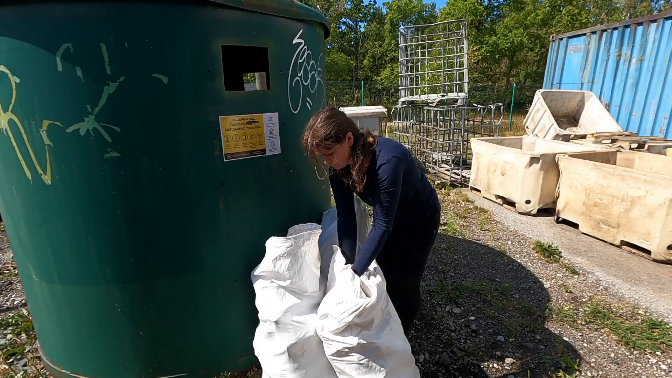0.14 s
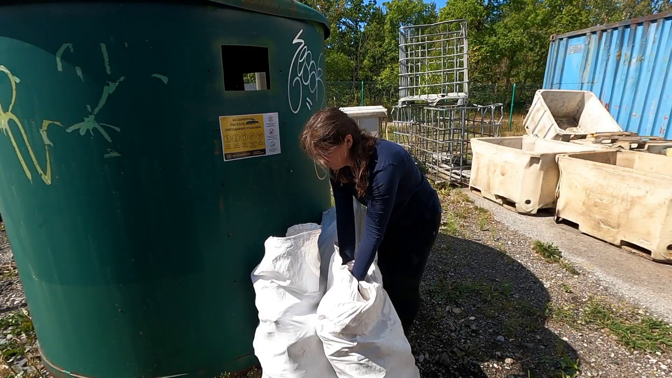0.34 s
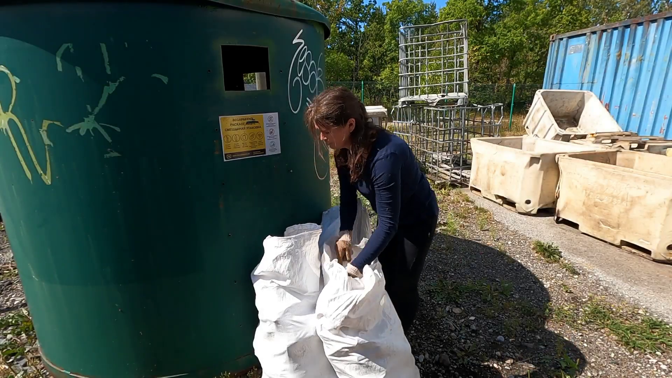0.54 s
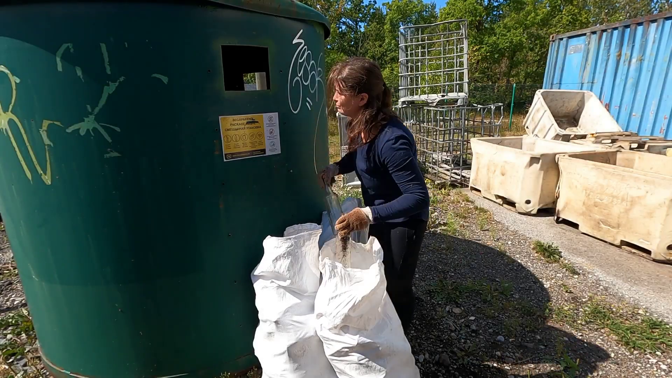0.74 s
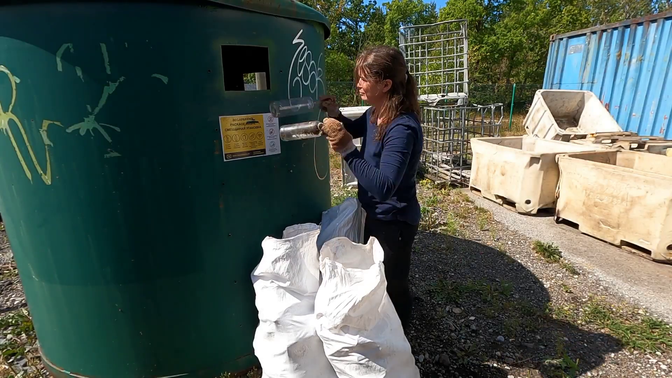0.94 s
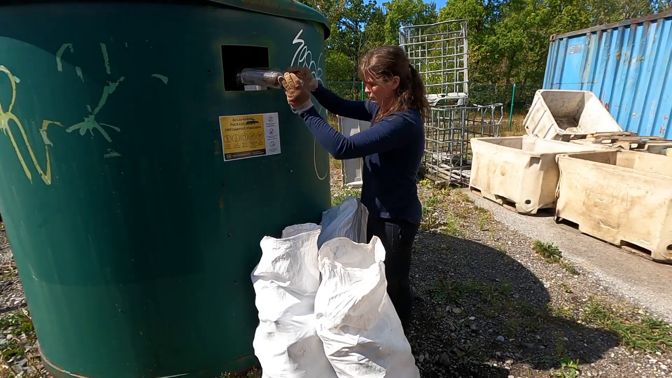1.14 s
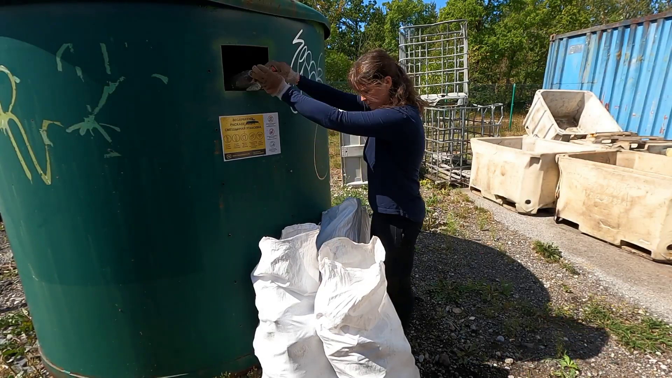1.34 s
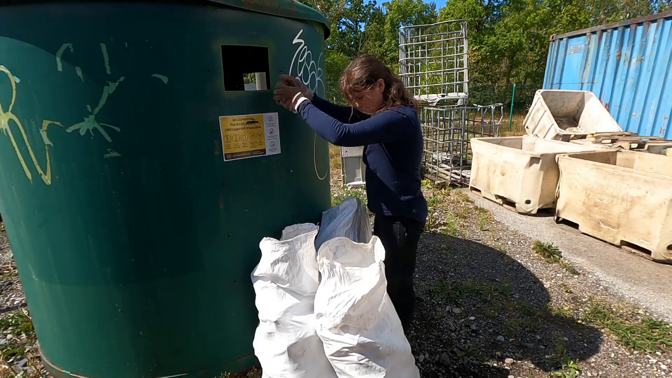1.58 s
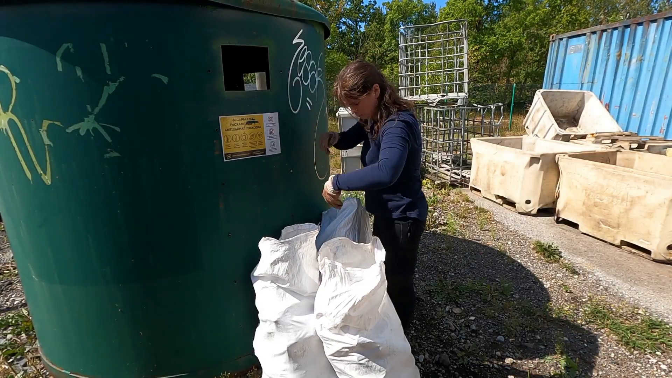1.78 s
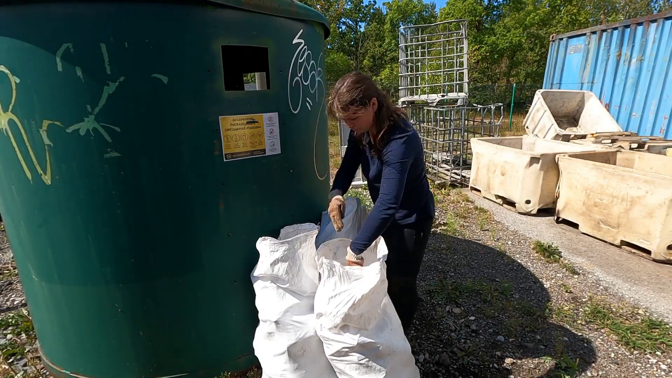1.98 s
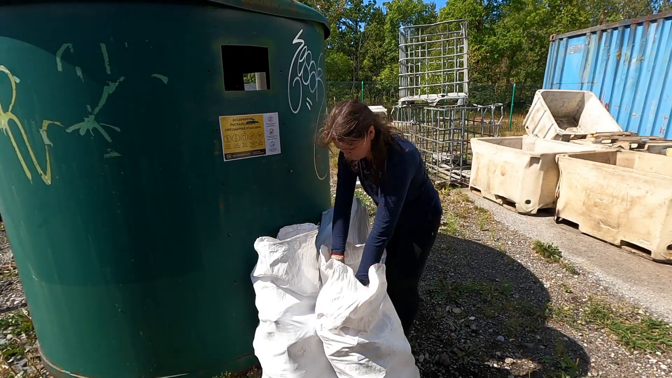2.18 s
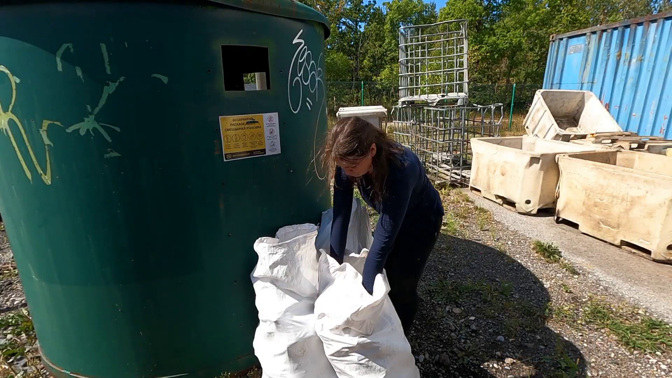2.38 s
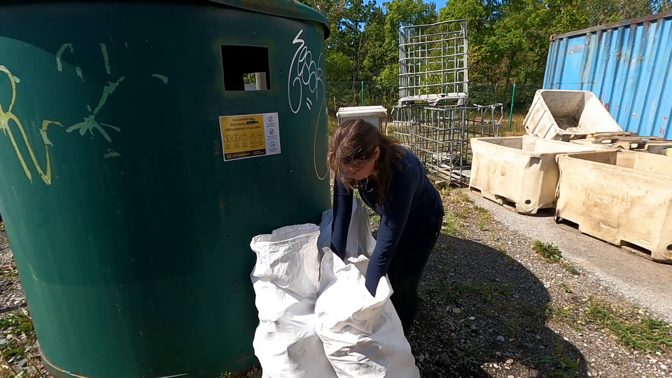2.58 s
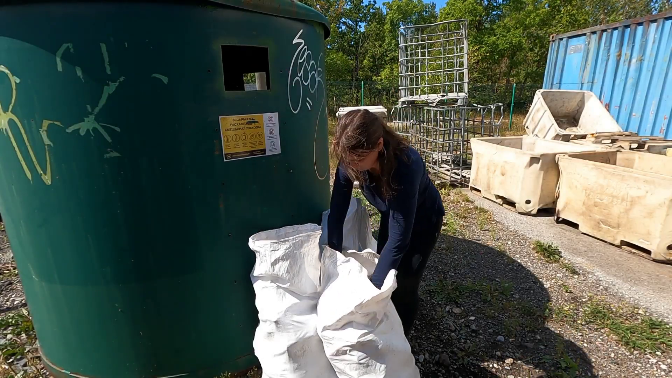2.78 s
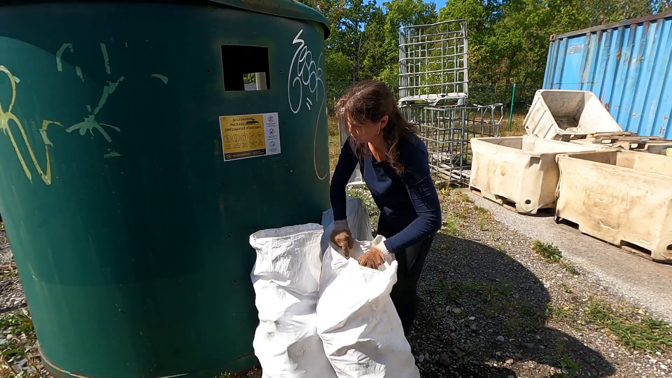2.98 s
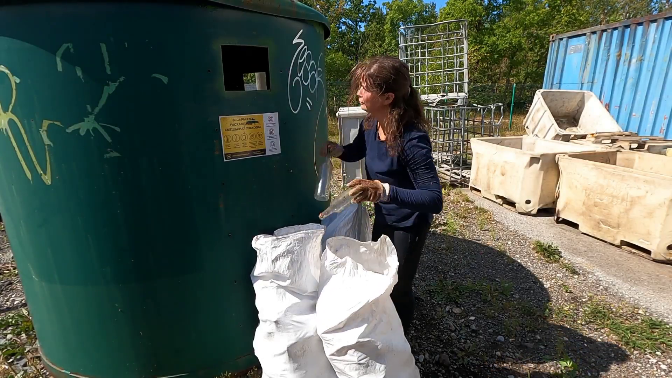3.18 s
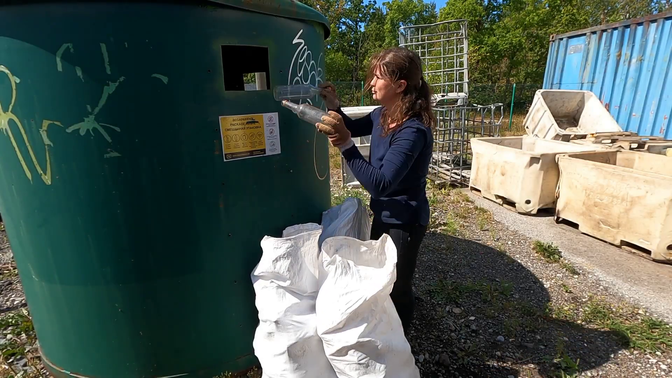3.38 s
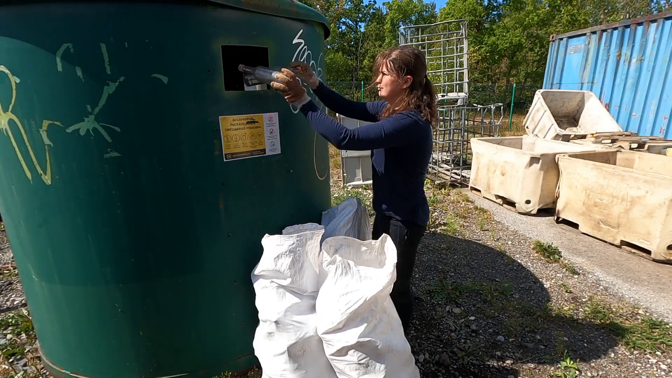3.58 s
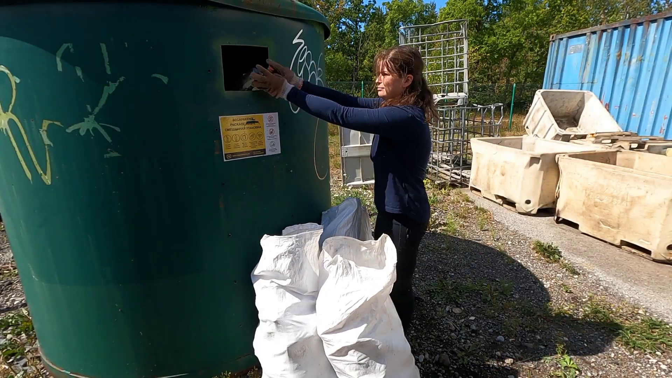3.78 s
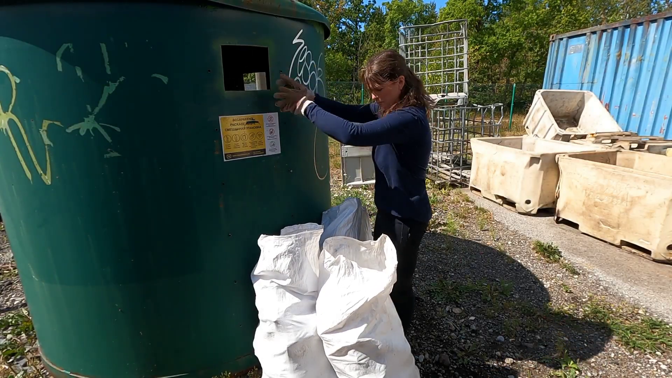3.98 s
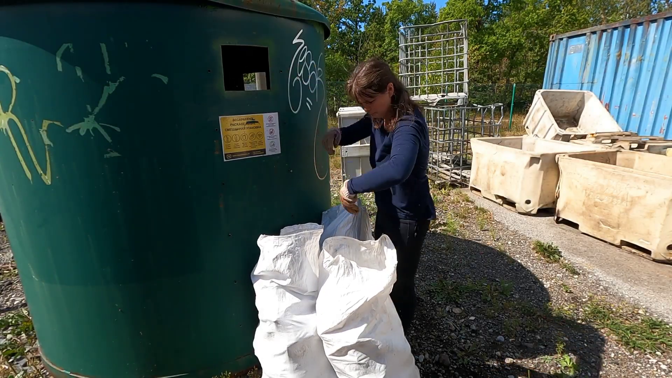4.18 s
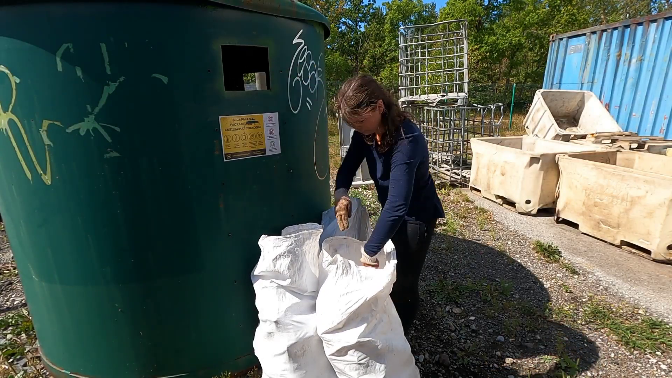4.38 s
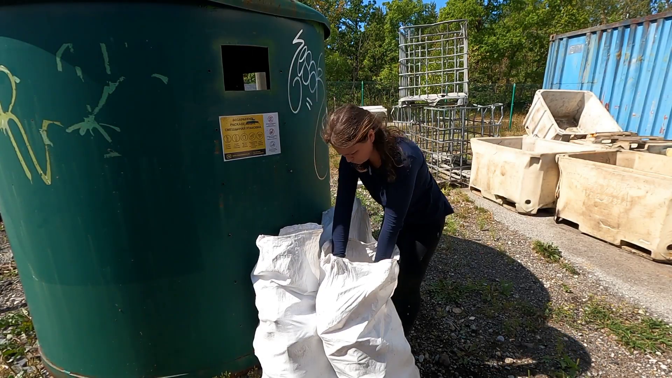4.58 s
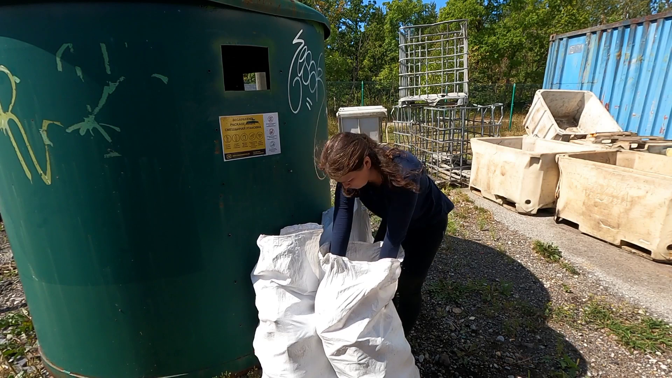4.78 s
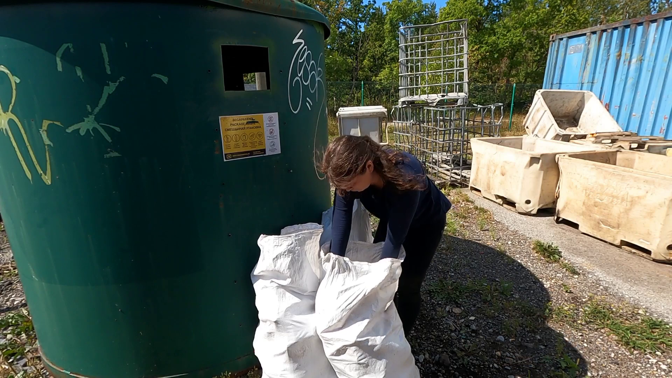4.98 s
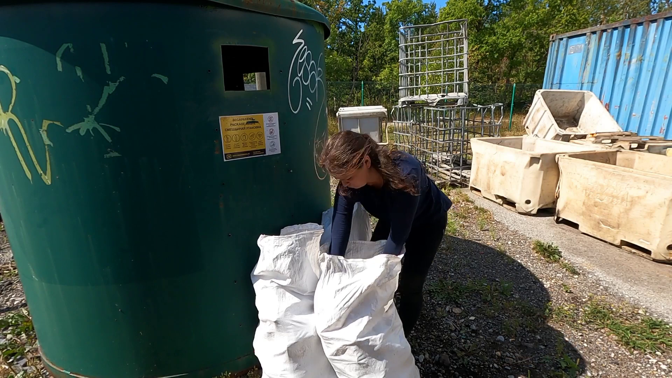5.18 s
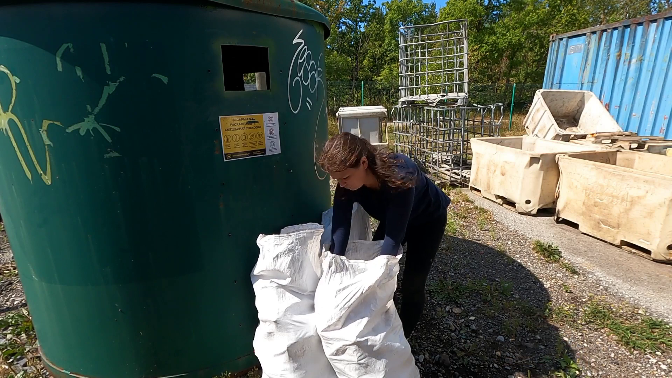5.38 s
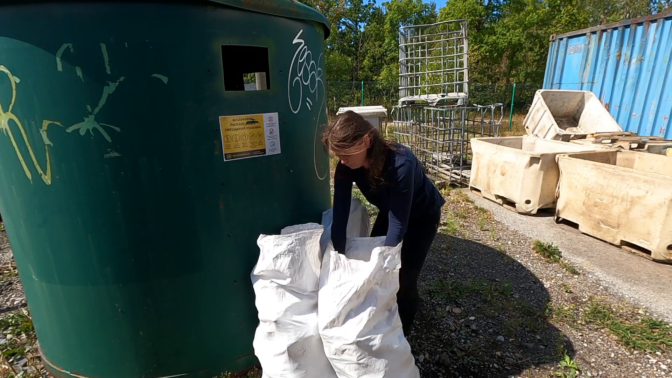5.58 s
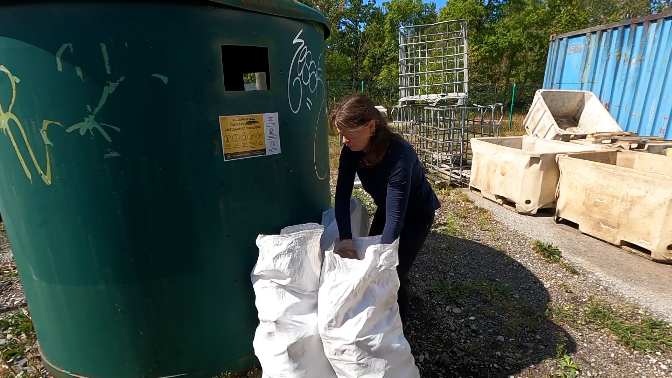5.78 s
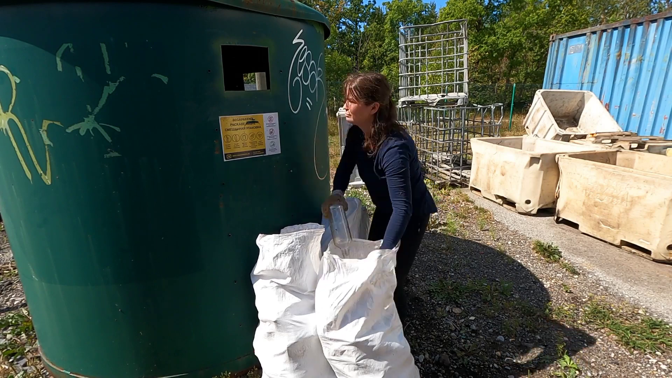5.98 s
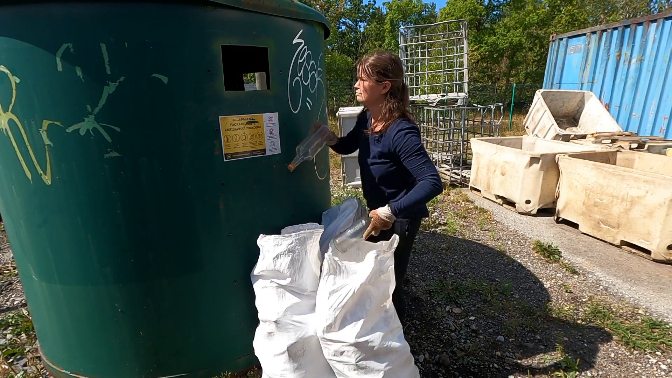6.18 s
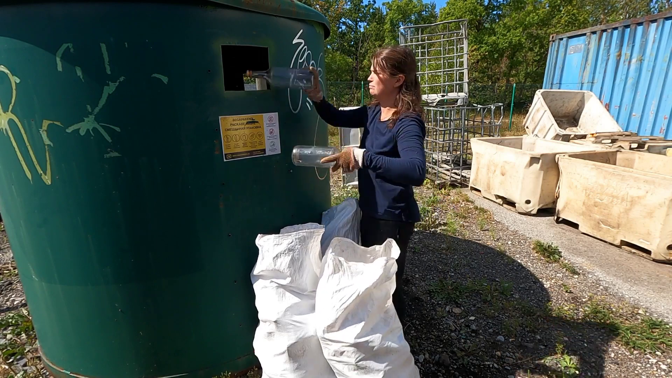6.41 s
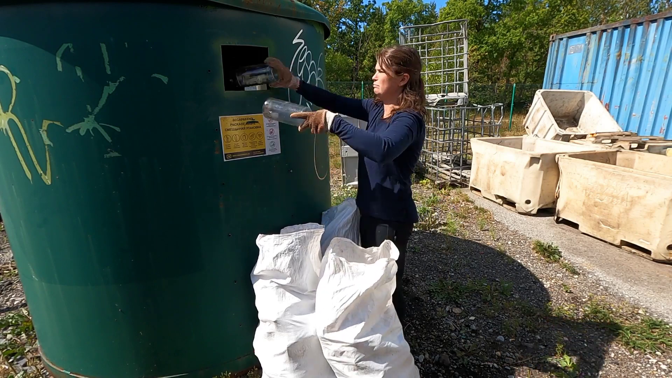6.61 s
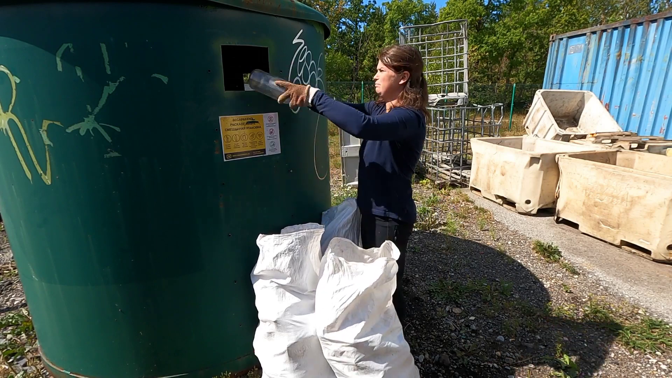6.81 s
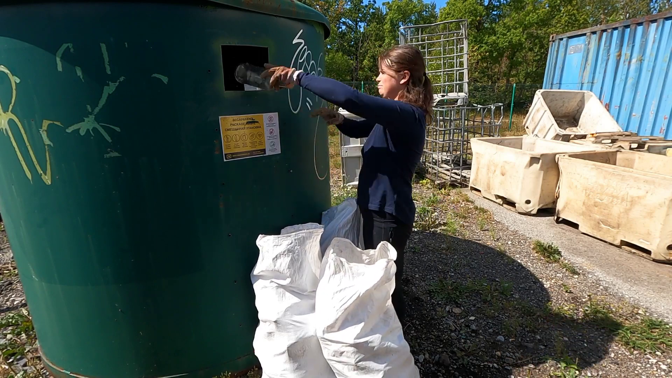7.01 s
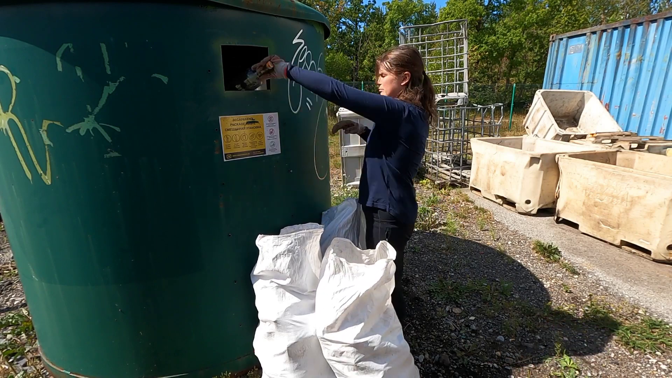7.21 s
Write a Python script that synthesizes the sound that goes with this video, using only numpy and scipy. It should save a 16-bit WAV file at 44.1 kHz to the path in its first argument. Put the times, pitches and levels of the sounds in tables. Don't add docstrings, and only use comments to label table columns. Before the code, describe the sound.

Close outdoor stereo sound of glass going into a large hollow plastic container. Bottles clink dully while a stiff sack rustles, then knock on the rim with a boom and crash onto broken glass, with shards tinkling after. More rummaging and clear bottle knocks follow, then a second sharper smash, more rummaging, and a last crash at the end. Light wind buffets the microphone over a quiet yard.

```python
import sys
import numpy as np
from scipy import signal
from scipy.fft import rfft, irfft
from scipy.io import wavfile
from scipy.ndimage import uniform_filter1d

SR = 44100
rng = np.random.default_rng(int(sys.argv[2]) if len(sys.argv) > 2 else 0)


def undo_db(level):
    steps = np.asarray(level, float) / 20
    return 10 ** steps


def unload_audio(sound):
    columns = np.transpose(np.atleast_2d(sound))
    steps = np.round(np.clip(columns, -1, 1) * 32767)
    wavfile.write(sys.argv[1], SR, steps.astype(np.int16))


N = 319725

# peak_s, level_db, build_s (time to grow by 20 dB)
GUSTS = [(.93, -27.5, 0.1), (1.15, -25.5, 0.3), (1.37, -25, 0.23), (1.84, -38, 1.4), (2.44, -30.5, 0.34),
         (3.35, -35.5, 1.1), (3.821, -50, 0.3), (4.26, -40, 0.5), (5.19, -36, .32), (6.4, -31.5, 0.02),
         (6.6, -41, 0.15), (6.78, -32.5, 0.09), (7.19, -26, 0.4)]
# pitch_hz, level_db (per Hz)
WIND_SPECTRUM = [(8.8, -22), (15, 5.5), (41, -4), (157, -16), (304, -39.5), (400, -41), (520, -53),
                 (880, -120)]
# pitch_hz, level_db (per Hz)
YARD_SPECTRUM = [(35, -25), (60, 6), (289, 6.5), (711, -16), (1390, -5), (2150, -19), (3660, -11),
                 (13500, -70)]
# time_s, level_db
STIRRING = [(0.0, -42), (0.5, -41), (0.67, -52), (1.0, -60), (1.9, -64.5), (2.03, -42), (2.82, -35.5),
            (3.17, -49.5), (3.3, -58), (4.2, -61.5), (4.38, -31.5), (5.26, -40), (5.63, -36), (5.98, -44.5),
            (6.25, -49.5), (6.77, -57.5), (7.25, -57)]
# pitch_hz, level_db (per Hz)
SACK_SPECTRUM = [(880, -1), (1500, -6), (2540, -9), (4140, -5), (6820, -10), (10600, -22.5), (11800, -23),
                 (15500, -32)]
# pitch_hz, level_db
HEAP_RINGS = [(2305, -18), (2583, 14), (3058, 10), (3250, 7), (3537, 9), (3833, -6), (4066, 10), (4847, -7),
              (5378, 4), (6070, -21), (6400, -10.5), (7610, -14)]
# pitch_hz, level_db (per Hz)
SHARD_SPECTRUM = [(1300, -4), (1900, -10.5), (2500, -7), (4000, -5), (8000, -8.5), (10500, -23),
                  (12500, -20.5), (15800, -33)]
# pitch_hz, level_db (per Hz)
WEIGHT_SPECTRUM = [(88, -10.5), (150, 0.5), (300, -5), (398, -0.5), (952, -5), (1760, -7.5), (3250, -48),
                   (5500, -120)]
# start_s, level_db, t60_s
SLIDES = [
    (1.86, -31, 2.04),
    (2.225, -31, 3),
    (2.62, -36, 1.6),
    (3.2, -50.5, 2.6),
    (4.209, -22.5, 0.23),
    (5.12, -33.5, 0.79),
    (5.97, -43.5, 1.74),
    (6.9, -38, 0.84),
    (7.134, -24.5, 0.11),
]
# start_s, peak_db, pitch_hz
KNOCKS = [(0.148, -16, 1310), (0.471, -25.5, 1160), (0.509, -19, 1530), (0.537, -17.5, 1180),
          (0.558, -19, 1020), (0.58, -26, 1160), (1.85, -10, 900), (2.817, -22, 1320), (2.861, -18, 1030),
          (2.894, -12, 1460), (3.014, -23, 1090), (3.176, -13, 1150), (4.209, -12, 1220),
          (4.706, -25.5, 1180), (5.24, -14, 1140), (5.46, -12.5, 1350), (5.515, -16.5, 1030),
          (5.779, -23.5, 1150), (5.972, -8, 1460), (6.061, -13, 1020)]
# pitch_hz, level_db (per Hz)
KNOCK_SPECTRUM = [(400, -6), (900, -0.5), (1700, -5), (3000, -7), (6000, -23)]
# start_s, peak_db, pitch_hz, overtone_hz
HELD_CLINKS = [(0.150, -20, 2380, 4150), (0.169, -18, 5160, 4150), (0.467, -26, 6450, 5260),
               (0.478, -20, 4880, 4050), (0.537, -17, 5620, 3290), (0.941, -32, 2570, 6440),
               (2.894, -21, 3520, 5100), (4.309, -17, 3100, 6150), (4.349, -33, 4030, 5950),
               (4.399, -20, 4900, 3390), (5.256, -26, 3510, 6200), (5.461, -21.5, 2380, 6040),
               (5.512, -15, 5270, 3440), (5.549, -20.5, 4300, 7000)]
# start_s, peak_db, pitch_hz
HELD_PLAIN_CLINKS = [
    (0.559, -24, 3230),
    (3.415, -38, 3500),
    (4.484, -16.5, 4100),
    (5.779, -18, 3950),
]
# start_s, peak_db, pitch_hz, overtone_hz
FREE_CLINKS = [
    (1.864, -11, 2300, 5440),
    (1.993, -13, 2427, 5950),
    (2.226, -15.5, 3900, 7650),
    (2.479, -27, 3250, 5650),
    (2.529, -19.5, 4460, 6010),
    (2.733, -25.5, 2990, 4630),
    (4.569, -25, 7850, 3530),
    (4.974, -30, 2565, 6450),
]
# start_s, peak_db, pitch_hz
FREE_PLAIN_CLINKS = [
    (1.934, -19, 3920),
    (2.144, -16, 3265),
    (2.294, -15, 3210),
    (4.811, -22, 3050),
]
# start_s, level_db, pitch_hz, t60_s
FIRST_CHIMES = [(1.858, -31, 5800, 0.27), (1.861, -29, 3980, 0.65), (1.863, -22, 5383.0, 0.16),
                (1.864, -21, 2593, 0.71), (1.877, -13, 5400, 0.13), (1.899, -18, 4940, 0.06),
                (1.916, -41.3, 9475.0, 0.04), (1.986, -20, 3850, 0.06), (1.988, -45, 7838.0, 0.17),
                (1.99, -15.5, 2460, 0.07), (1.993, -46.4, 11542.0, 0.19), (2, -25, 4500, 0.19),
                (2.004, -25, 6000, 0.19), (2.014, -37, 9600, 0.04), (2.043, -31, 3440, 0.06),
                (2.097, -38, 3790.0, 0.16), (2.121, -39, 7670, 0.24), (2.143, -49, 7364.0, 0.25),
                (2.223, -40.2, 8570, 0.1), (2.224, -28, 3870, 0.06), (2.226, -29, 5400, 0.16),
                (2.267, -38.2, 7278.0, 0.06), (2.271, -31, 6400, 0.11), (2.284, -23, 1126, 0.23),
                (2.302, -45, 7881.0, 0.1), (2.31, -24, 2240, 0.16), (2.347, -36, 3940, 0.36),
                (2.354, -33, 5383.0, 0.29), (2.378, -36, 8441.0, 0.53), (2.403, -24.5, 3300, 0.11),
                (2.415, -39.5, 5300, 0.059), (2.422, -35, 2834, 0.33), (1.935, -23, 2570, 0.2),
                (2.485, -30, 3252.0, 0.19), (2.487, -41, 9700, 0.44), (2.522, -34, 6960, 0.06),
                (2.528, -36, 8200, 0.28), (2.528, -37, 3380, 0.33), (2.535, -40, 2920, 0.27),
                (2.537, -38, 9022.0, 0.18), (2.541, -41, 9200, 0.11), (2.546, -31, 6050, 0.06),
                (2.552, -42.3, 7840, 0.06), (2.563, -35, 4040, 0.31), (2.72, -39, 7235.0, 0.25),
                (2.747, -29.5, 3300, 0.065), (2.885, -18, 3550, 0.096), (2.896, -25, 2570, 0.1)]
# start_s, level_db, pitch_hz, t60_s
SECOND_CHIMES = [(4.221, -22, 5900, 0.18), (4.235, -37, 10939.0, 0.37), (4.244, -34, 9800, 0.5),
                 (4.244, -24, 8460, 0.18), (4.25, -16, 4870, 0.06), (4.272, -30, 7257.0, 0.67),
                 (4.283, -28, 7924.0, 0.04), (4.296, -31, 3060, 0.11), (4.302, -42.2, 10700, 0.04),
                 (4.305, -24.5, 1390, 0.15), (4.311, -33, 6000, 0.39), (4.313, -35, 9647.0, 0.22),
                 (4.315, -34, 8419.0, 0.19), (4.331, -25, 5470, 0.15), (4.347, -28, 4134.0, 0.13),
                 (4.348, -34, 9860, 0.45), (4.363, -40.3, 12037.0, 0.04), (4.374, -29, 3370, 0.11),
                 (4.38, -29, 7450.0, 0.32), (4.387, -31, 7278.0, 0.07), (4.388, -33, 2560, 0.53),
                 (4.398, -22, 4900, 0.094), (4.407, -32, 7460, 0.07), (4.409, -41, 10100, 0.39),
                 (4.483, -36, 5900, 0.19), (4.485, -26, 4160, 0.06), (4.49, -27, 2280, 0.25),
                 (4.507, -35, 7666.0, 0.71), (4.535, -29, 5146.0, 0.24), (4.542, -30, 11391.0, 0.35),
                 (4.563, -36, 4820, 0.32), (4.574, -33.5, 7170, 0.22), (4.592, -29, 7900, 0.17),
                 (4.601, -35.5, 9110, 0.35), (4.631, -27, 6309.0, 0.078), (4.819, -26, 3083, 0.05)]
# start_s, level_db, pitch_hz, t60_s
OTHER_CHIMES = [(7.148, -14, 4050, 0.21), (0.167, -26, 6280, 0.04), (0.166, -23, 2790, 0.04),
                (0.467, -32, 7250, 0.05), (1.32, -23, 1000, 0.08), (3.177, -34, 11950, 0.063),
                (1.496, -31, 8400, 0.05), (1.496, -31, 6450.0, 0.04), (1.496, -29, 7429.0, 0.04),
                (1.494, -41, 3280, 0.04), (1.496, -21, 2550, 0.1), (1.499, -24, 4700, 0.05),
                (3.013, -34, 6352.0, 0.076), (3.018, -31, 2542, 0.24), (3.224, -32.5, 2584.0, 0.38),
                (3.82, -22, 3280, 0.082), (5.127, -35, 5530, 0.14), (5.127, -37, 2480, 0.13),
                (5.138, -29, 6331.0, 0.18), (5.51, -32, 6670, 0.04), (5.552, -38, 4070.0, 0.19),
                (5.97, -26, 4060, 0.1), (5.973, -25, 3407, 0.1), (5.972, -34.1, 4888.0, 0.04),
                (7.169, -24.5, 4030, 0.34), (6.057, -32.5, 4830, 0.04), (6.059, -33, 7030, 0.04),
                (6.784, -37.5, 8600, 0.14), (7.132, -24.5, 2600, 0.5), (7.145, -24, 7000, 0.05),
                (7.154, -36.5, 8300, 0.24), (7.17, -31, 2350, 0.11), (4.92, -33, 3500, 0.23),
                (7.178, -29, 5550, 0.23), (7.188, -28, 5900, 0.04), (7.189, -27, 6850, 0.12)]
# start_s, level_db, pitch_hz, t60_s
PINGS = [
    (.168, -25, 8960, 0.044),
    (0.403, -41, 2300, 0.096),
    (1.852, -26, 152, 0.091),
    (2.23, -26.5, 2244, 0.4),
    (4.211, -36, 145, 0.098),
    (4.44, -26, 1377, 0.14),
    (6.42, -38, 135, 0.6),
    (5.775, -31, 2440, 0.12),
    (5.86, -34, 3380, 0.11),
    (7.14, -20, 168.5, 0.12),
]
# start_s, level_db
NUDGES = [
    (2.09, -22),
    (2.28, -22),
    (4.23, -25),
    (4.386, -27),
]
# start_s, peak_db
TICKS = [(0.345, -22), (0.652, -29.5), (0.692, -39), (1.296, -43), (4.1016, -38), (5.279, -23.5),
         (5.346, -29), (6.2564, -27.5), (6.3784, -38), (6.4454, -34), (7.0444, -34)]
# start_s, level_db, crack_db (under the blow)
BLOWS = [(1.3209, -31, 0), (1.4336, -19, -3.5), (1.497, -15.5, -2), (3.015, -18, -8), (3.177, -8.5, -13),
         (3.736, -33, 0), (3.768, -14, -4), (3.822, -16, -4), (5.127, -15.5, -11), (5.97, -16, -3.5),
         (6.0612, -14.5, -9), (6.782, -15, -1.5), (7.139, -11.5, -0.5)]
# pitch_hz, level_db, t60_s
EARLY_BOTTLES = [
    [(2300, 13, 0.28)],
    [(2300, -7, 0.11), (3900, -4, 0.08), (5660, -2, 0.052), (8340, -6.5, 0.024)],
    [(2600, -1, 0.18), (3250, 5, 0.081), (4900, -1, 0.15), (5800, 1.5, 0.03), (6450, -6, 0.089),
     (7450, 4.5, 0.039)],
    [(2564, -10, 0.38), (3440, -0.5, 0.1), (6000, -10, 0.17)],
    [(2580, -6, 0.45), (3530, 0.5, 0.14), (3605, 4.5, 0.12), (7220, -15, 0.14)],
    [(2650, -3, 0.27), (6200, 0, 0.045)],
]
# pitch_hz, level_db, t60_s
LATER_BOTTLES = [
    [(2574, -10, 0.11), (3365, -0.5, 0.066), (4880, -5.5, 0.08), (6160, -7, 0.14)],
    [(2569, 5, 0.2), (3510, 7, 0.11), (4750, -3, 0.085), (4967, -5, 0.31), (6240, -3, 0.12),
     (7370, -12, 0.15)],
    [(2500, -6.5, 0.3), (4070, 2, 0.087), (5550, -15, 0.17), (6350, -9, 0.52), (7040, -12, 0.067),
     (8960, -14.5, 0.5)],
    [(3350, 0, 0.086), (4060, -4.5, 0.17), (5040, -14, 0.11)],
    [(2540, 1, 0.1), (3230, -5, 0.067), (4270, -5.5, 0.16), (4790, 1.5, 0.03), (6320, -4.5, 0.028),
     (7120, -5, 0.05)],
    [(2410, 4.5, 0.23), (4010, -4.5, 0.18), (5520, -0.5, 0.13), (6000, -3.5, 0.18), (6970, -13, 0.15)],
    [(2380, -4.5, 0.23), (2570, 5.5, 0.15), (3050, 2.5, 0.075), (4030, -4, 0.39), (5940, -4, 0.51),
     (5900, 1, 0.05)],
]
# start_s, level_db (under its blow)
REBOUNDS = [
    (6.078, -8),
    (6.113, -11),
    (6.161, -13.5),
]
# start_s, peak_db, depth_db
THUDS = [(1.32, -13.5, -11), (1.434, -12.5, -17), (1.498, -16, -13), (1.849, -13, -2.5), (2.22, -26.5, 2.5),
         (2.262, -17, -5), (3.733, -18, -21), (3.767, -16, -19), (3.821, -20.5, -6), (4.207, -27.5, 9),
         (4.359, -27.5, 0), (6.782, -12.5, -14.5), (7.133, -39, 18.5)]
# pitch_hz, level_db (per Hz)
HOLLOW_SPECTRUM = [(120, -35), (200, -5), (480, -8), (950, -4.5), (1950, -23.5), (2770, -16), (9000, -47.5),
                   (19800, -120)]
# pitch_hz, t60_s
HOLLOW_DECAY = [(400, 0.94), (900, 0.81), (1600, 0.61), (3000, 0.21), (7000, 0.59)]
# pitch_hz, width_hz, level_db
AIR_MODES = [(134, 36, -1), (401, 24, -8), (652, 18, -13), (826, 26, -13)]
# start_s, level_db, t60_s (of the debris)
SMASHES = [(1.837, -31, 0.5), (1.852, -21, 0.99), (1.869, -12.5, 0.91), (1.995, -12.5, 0.43),
           (2.145, -22.5, 0.94), (2.225, -19, 1), (2.2794, -22.5, 1), (2.534, -21.5, 0.28),
           (2.7092, -24.5, .6), (4.206, -14, 0.34), (4.221, -8, 0.35), (4.2544, -14, 1), (4.3494, -23, 1),
           (4.4844, -18, 0.38), (4.5794, -27.5, 1), (7.13, -15, 0.72)]
# start_s, stop_s, first_hz, last_hz
SCRAPE = (2.862, 2.91, 4700, 3500)
# pitch_hz, left_lead_rad, left_over_right_db
PORTS = [(200, 0.25, -0.5), (700, -0.24, 2.5), (1990, -1.33, -1), (2430, 0.85, 0), (4450, -1.18, 2.5),
         (6200, -0.23, -2), (7800, -0.63, 3), (11000, -0.67, 0)]

DEAD_DB = -37


def read(points, hz):
    f, value = np.transpose(points)
    return np.interp(np.log(hz + 1), np.log(f + 1), value)


def stirring_db():
    time_s, level_db = np.transpose(STIRRING)
    return np.interp(np.arange(N) / SR, time_s, level_db)


def evened(x):
    return x / np.sqrt(np.mean(x ** 2) + 1e-20)


def add(mix, s, sound):
    part = mix[round(s * SR):][:len(sound)]
    part += sound[:len(part)]


def coloured(x, points):
    hz = np.fft.rfftfreq(x.shape[-1], 1 / SR)
    inside = (hz > points[0][0]) & (hz < points[-1][0])
    return evened(irfft(rfft(x) * undo_db(read(points, hz)) * inside, x.shape[-1]))


def pair(alike):
    both, side = rng.standard_normal((2, N))
    side_size = np.sqrt(np.clip((1 - alike) / (1 + alike), 0, 1))
    return both + side_size * np.array([side, -side])


def fading(s, db, t60, fill_s):
    t, energy = np.arange(SR) / SR, np.zeros(N)
    for start, level_db, decay in np.broadcast(s, db, t60):
        add(energy, start, undo_db(2 * (level_db - 60 * t / decay)) * (1 - np.exp(-t / fill_s)))
    return np.sqrt(energy)


def nearby(x):
    t = np.arange(6000) / SR
    signs = rng.choice([-1., 1.], (2, 6000))
    taps = signs * (rng.random((2, 6000)) < .05) * undo_db(-60 * t / 0.15) * (t > .002)
    taps = taps + 0.52 * taps[::-1]
    return signal.oaconvolve(x[None], taps / np.linalg.norm(taps[0]), axes=1)[:, :N]


def ring(hz, db, t60, rise=0.0007, linger_db=-18.5):
    t = np.arange(round(min(7.3 * t60, .7) * SR)) / SR
    split, share, phase = rng.uniform([-65, .2, 0], [65, .6, 1], (2, 3)).T[..., None]
    twins = (share * np.sin(2 * np.pi * (hz + split) * t + phase)).sum(0)
    lines = 0.75 * (np.sin(2 * np.pi * hz * t) + twins)
    shake = np.interp(t, np.arange(200) * 0.0064, rng.standard_normal(200))
    shake_db = 4.0 * shake * np.minimum(t / .012, 1)
    dying = undo_db(-60 * t / t60) + undo_db(linger_db - 60 * t / (3.7 * t60))
    ends = (1 - np.exp(-t / rise)) * np.minimum(4 * (1 - t / t[-1]), 1)
    return undo_db(db + shake_db) * dying * lines * ends


def crack(db, t60, colour):
    t = np.arange(2048) / SR
    return undo_db(db - 60 * t / t60) * np.minimum(t / .001, 1) * coloured(rng.standard_normal(2048), colour)


def wind():
    lull_db, fall_db_per_s = -63., 190
    lumps = undo_db(2.0 * evened(uniform_filter1d(rng.standard_normal(N), 2500)))
    t, level_db = np.arange(N) / SR, np.full(N, lull_db)
    for s, db, build_s in GUSTS:
        drop_db = np.maximum(20 * (s - t) / build_s, fall_db_per_s * (t - s))
        level_db = np.maximum(level_db, db - drop_db)
    pressure = undo_db(level_db) * coloured(pair(0.84) * lumps, WIND_SPECTRUM)
    return pressure * undo_db(np.array([[-1.8], [1.8]]))


def yard():
    return undo_db(-55.5) * coloured(pair(0.94), YARD_SPECTRUM)


def tinkle(pitches, per_s, longest, chance):
    out, at = np.zeros((2, N)), np.flatnonzero(rng.random(N) < per_s / SR)
    force_db = 1.6 * np.minimum(rng.exponential(1, len(at)), 4)
    for (hz, db), (share, side) in zip(pitches, rng.uniform([.3, -3], [1, 3], (len(pitches), 2))):
        taps, r = np.zeros(N), undo_db(-60 / (share * longest * SR))
        struck = rng.random(len(at)) < chance
        taps[at] = undo_db(db + force_db) * rng.standard_normal(len(at)) * struck
        turn = 2 * np.pi * hz / SR
        tone = signal.lfilter([np.sin(turn)], [1, -2 * r * np.cos(turn), r * r], taps)
        out += tone * undo_db(np.array([[side], [-side]]))
    return evened(out)


def clatter():
    heap = tinkle(HEAP_RINGS, 200., 0.1, .3)
    shard_pitches = rng.uniform([2100, -2], [13000, 0], (120, 2))
    shards = coloured(tinkle(shard_pitches, 400., 0.1, .1), SHARD_SPECTRUM)
    glass = .22 * heap + .65 * shards
    return evened(glass + 0.52 * nearby(glass.mean(0)))


def rustle(glass):
    snaps = undo_db(3.8 * rng.exponential(1, N).clip(0, 4)) * (rng.random(N) < 90. / SR)
    bursts = signal.lfilter([1], [1, -.994], snaps)
    sack = coloured(pair(0.81) * (1 + 0.55 * evened(bursts)), SACK_SPECTRUM)
    level_db = stirring_db()
    hard = np.clip((level_db + 44.0) / 14, .15, .85)
    return undo_db(level_db) * ((1 - hard) * sack + hard * glass)


def shifting():
    lumps = undo_db(3.26 * evened(uniform_filter1d(rng.standard_normal(N), 700)))
    steady = undo_db(np.minimum(stirring_db() - 4.5, -43.5))
    level = np.hypot(steady, fading(*np.transpose(SLIDES), 0.0022))
    return level * coloured(pair(1.0) * lumps, WEIGHT_SPECTRUM)


def knocks(out):
    for s, db, hz in KNOCKS:
        add(out, s, ring(hz, db - .7, 0.015, 0.00019, DEAD_DB))
        add(out, s, ring(0.632 * hz, db - 9.5, 0.013, 0.00017, DEAD_DB))
        add(out, s, crack(min(db, -11.5) - 6.0, 0.026, KNOCK_SPECTRUM))


def clinks(out, rows, t60):
    for s, db, low_hz, *overtones in rows:
        add(out, s, ring(low_hz, db - 8.0, t60, 0.00091))
        for high_hz in overtones:
            add(out, s, ring(high_hz, db - 13, t60, 0.0006))
        for hz, weaker_db in rng.uniform([2200, -23], [8000, -14], (6, 2)):
            add(out, s, ring(hz, db + weaker_db, .02, linger_db=DEAD_DB))
        add(out, s, crack(db - 12.0, 0.053, SACK_SPECTRUM))


def chimes():
    out, rows = np.zeros((N, 2)), FIRST_CHIMES + SECOND_CHIMES + OTHER_CHIMES
    draws = rng.uniform([25, .3, -4], [80, .6, 4], (len(rows), 3))
    for (s, db, hz, t60), (twin_hz, share, side) in zip(rows, draws):
        t = np.arange(round(np.clip(0.81 * t60, .04, .3) * SR)) / SR
        lines = np.sin(2 * np.pi * hz * t)
        lines = lines + share * np.sin(2 * np.pi * (hz + twin_hz) * t)
        lines = lines + .35 * np.sin(2 * np.pi * (hz - .6 * twin_hz) * t)
        level_db = db - 2.5 - max(hz - 8000, 0) / 600 - 60 * (t / t[-1]) ** 1.42
        tone = undo_db(level_db) * (1 - np.exp(-t / 0.002)) * lines
        add(out, s, np.outer(tone, undo_db(np.array([side, -side]))))
    return out.T + undo_db(-2.5) * nearby(out.mean(1))


def pings(out):
    singing = [(s, db, 2580, 0.33) for s, db in NUDGES]
    for s, db, hz, t60 in PINGS + singing:
        add(out, s, ring(hz, db, t60, 0.0044))


def ticks(out):
    for s, db in TICKS:
        add(out, s, ring(3650 * rng.uniform(0.96, 1.06), db - 8, 0.013, .0002, DEAD_DB))
        add(out, s, crack(db - 9.5, 0.055, SACK_SPECTRUM))


def blow(db, crack_db, modes):
    out, top_db = np.zeros(SR), max(mode[1] for mode in modes)
    for hz, mode_db, t60 in modes:
        add(out, 0, ring(hz, db - 6.0 + mode_db - top_db, np.clip(t60, .03, .45)))
    add(out, 0, crack(db + crack_db, 0.021, SACK_SPECTRUM))
    return out


def bottle_blows(out):
    for (s, db, crack_db), modes in zip(BLOWS, EARLY_BOTTLES + LATER_BOTTLES):
        add(out, s, blow(db, crack_db, modes))
    damped = [(hz, db, .5 * t60) for hz, db, t60 in LATER_BOTTLES[4]]
    for s, under_db in REBOUNDS:
        add(out, s, blow(BLOWS[10][1] + under_db, 0.5, damped))


def container():
    s, db, depth_db = np.transpose(THUDS)
    hz = np.fft.rfftfreq(N, 1 / SR)
    both, side = coloured(rng.standard_normal((2, N)), HOLLOW_SPECTRUM)
    side = irfft(rfft(side) * np.clip(hz / 4000, 0, .25), N)
    noise = rfft(both + np.array([side, -side]))
    for mode_hz, width, mode_db in AIR_MODES[1:]:
        noise = noise * (1 + undo_db(mode_db + 12.5) / (1 + (2 * (hz - mode_hz) / width) ** 2))
    mode_hz, width, mode_db = AIR_MODES[0]
    lowest = 1 / (1 + (2 * (hz - mode_hz) / (3 * width)) ** 2)
    deep = evened(irfft(rfft(rng.standard_normal(N)) * lowest, N))
    out = deep * fading(s, db - 6 + depth_db + mode_db, 0.71, 0.0015)
    centres = np.log([f for f, t60 in HOLLOW_DECAY])
    for k, (f, t60) in enumerate(HOLLOW_DECAY):
        band = np.interp(np.log(hz + 1), centres, np.arange(len(centres)) == k)
        out = out + fading(s, db - 9.0, t60, 0.0012) * irfft(noise * np.sqrt(band), N)
    return out


def shatter(glass):
    s, db, t60 = np.transpose(SMASHES)
    debris = fading(s, db - 10, t60, .003)
    return debris * (glass + 0.8 * coloured(pair(0.82), SHARD_SPECTRUM))


def scrape(out):
    start, stop, first_hz, last_hz = SCRAPE
    for way, spread, size_db in rng.uniform([0, .75, -8], [1, 1.1, 0], (40, 3)):
        hz = spread * (first_hz + way * (last_hz - first_hz))
        add(out, start + way * (stop - start), ring(hz, size_db - 25.5, 0.028))


def ports(x):
    f, lead, lean_db = np.transpose(PORTS)
    hz = np.fft.rfftfreq(N, 1 / SR)
    half = undo_db(np.interp(hz, f, lean_db) / 2) * np.exp(.5j * np.interp(hz, f, lead))
    return irfft(rfft(x) * np.array([half, 1 / half]), N)


def scene():
    air = wind() + yard()
    glass = clatter()
    near = rustle(glass) + shifting()
    struck = np.zeros(N)
    knocks(struck)
    clinks(struck, HELD_CLINKS + HELD_PLAIN_CLINKS, 0.06)
    near = near + chimes()
    pings(struck)
    ticks(struck)
    bottle_blows(struck)
    near = near + container() + shatter(glass)
    clinks(struck, FREE_CLINKS + FREE_PLAIN_CLINKS, 0.26)
    scrape(struck)
    near = near + struck + undo_db(-4.0) * nearby(struck)
    return ports(near) + air


def roll_off(x):
    return signal.sosfilt(signal.butter(12, 16460, fs=SR, output="sos"), x)


def record(dry):
    dulled = signal.lfilter(*signal.butter(4, 13000, fs=SR), dry)
    return roll_off(dulled)


dry = scene()
out = record(dry)
unload_audio(out)
```